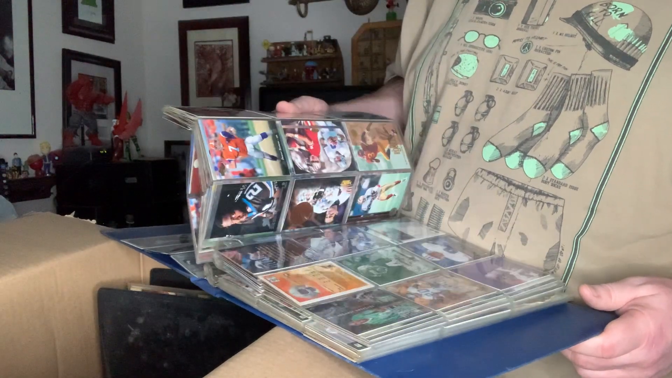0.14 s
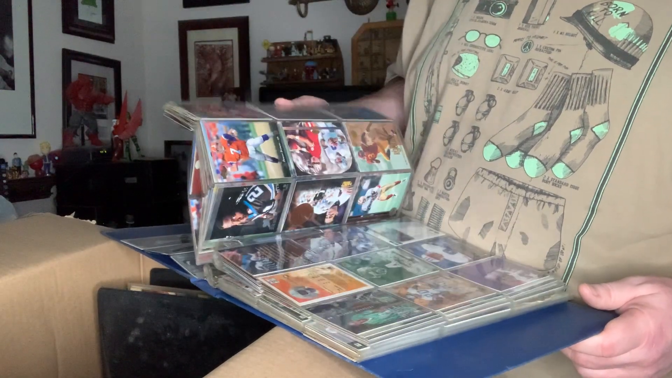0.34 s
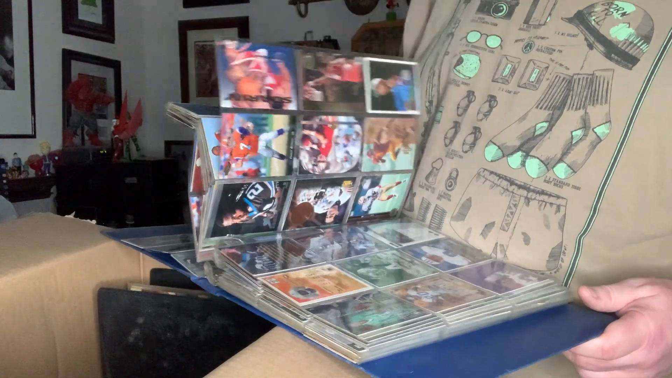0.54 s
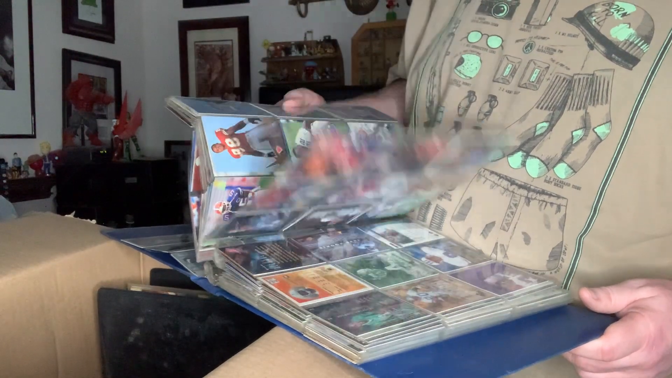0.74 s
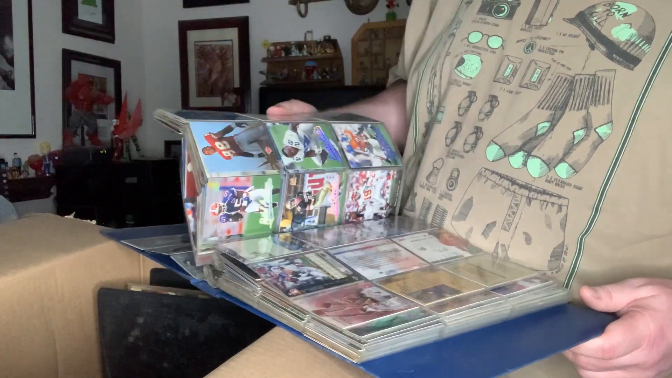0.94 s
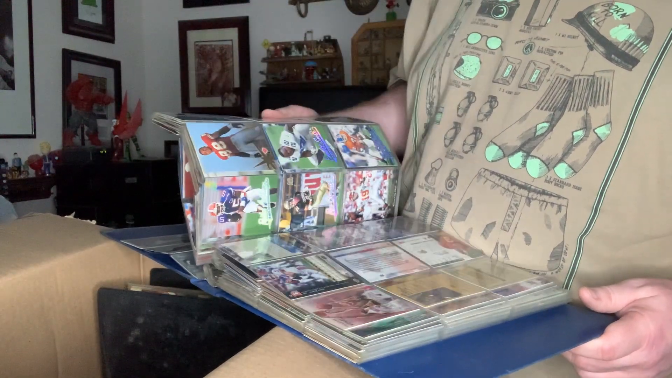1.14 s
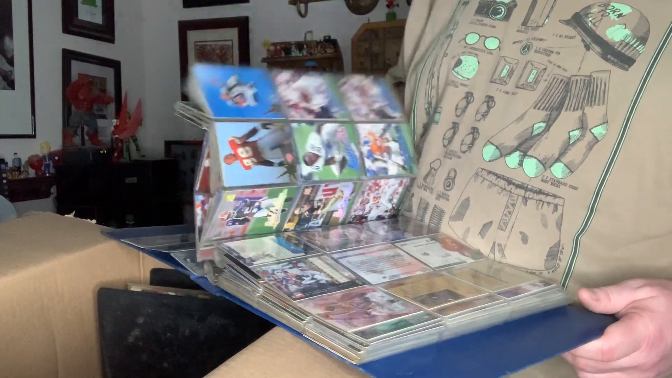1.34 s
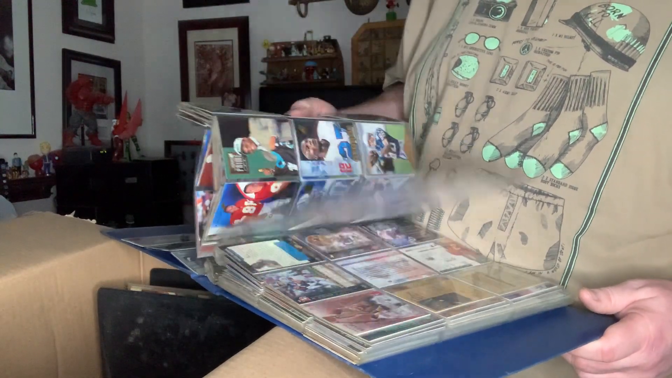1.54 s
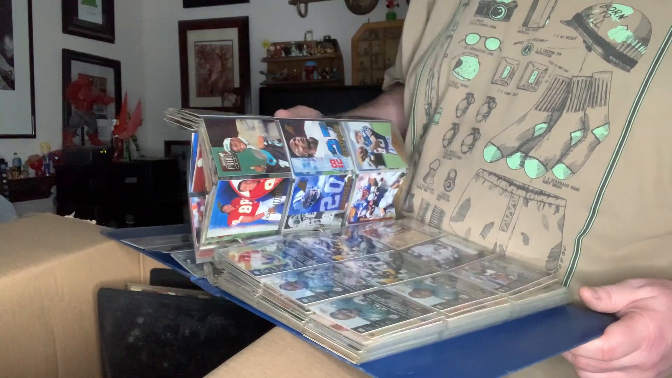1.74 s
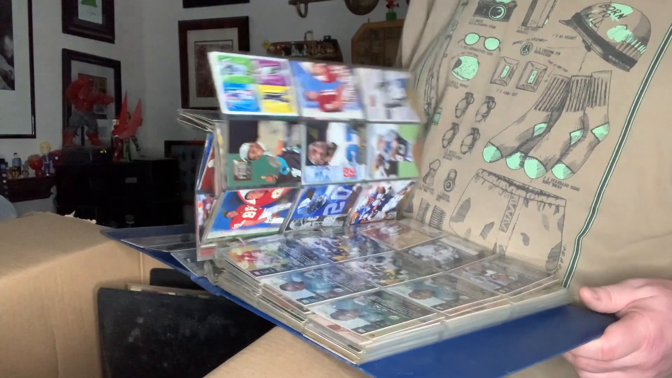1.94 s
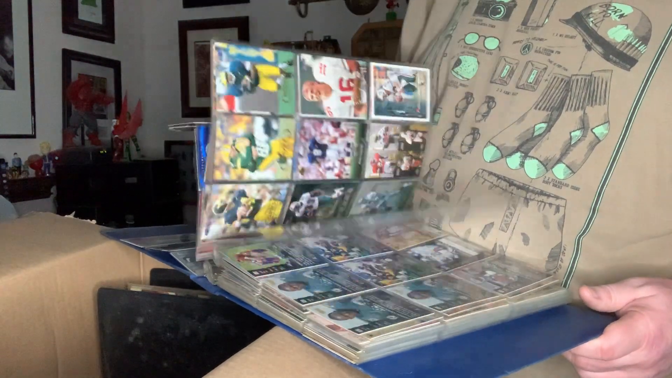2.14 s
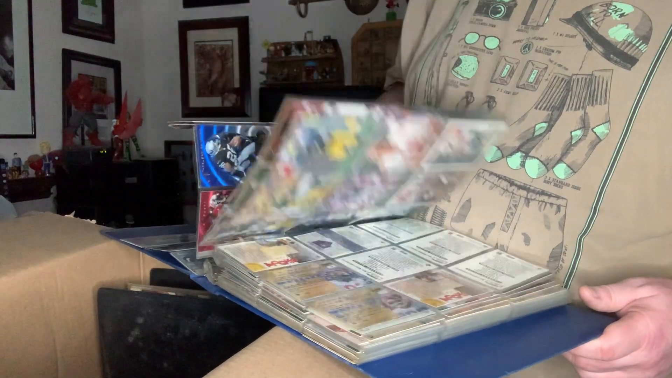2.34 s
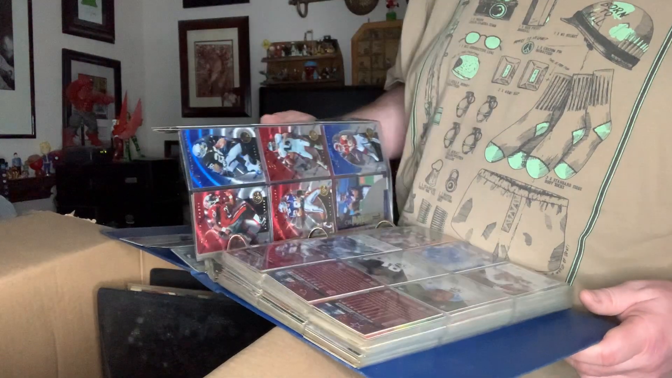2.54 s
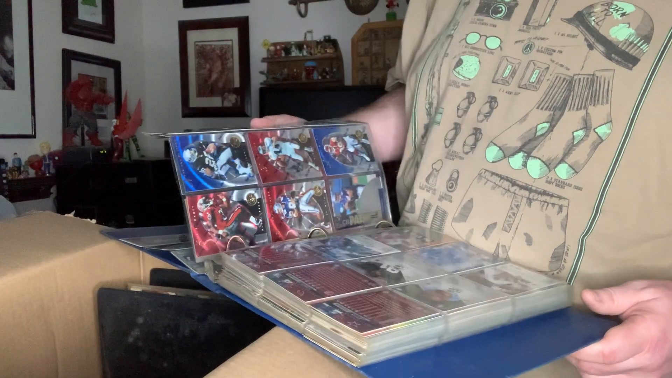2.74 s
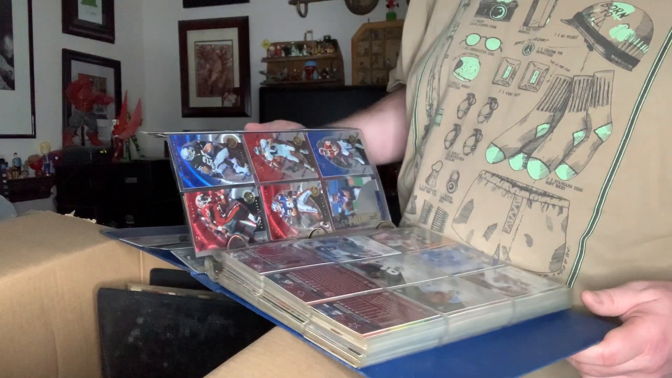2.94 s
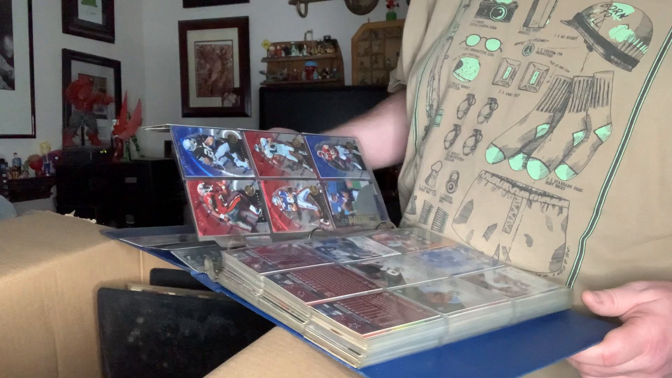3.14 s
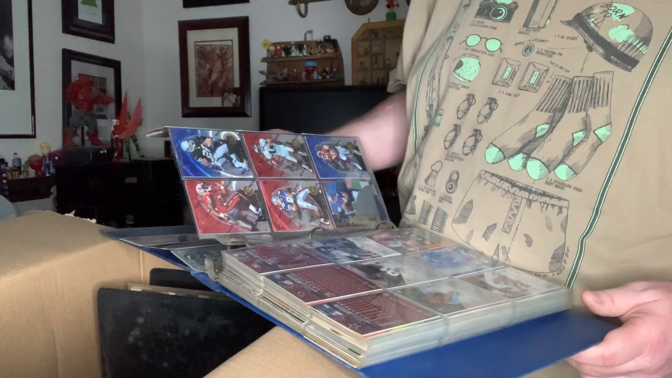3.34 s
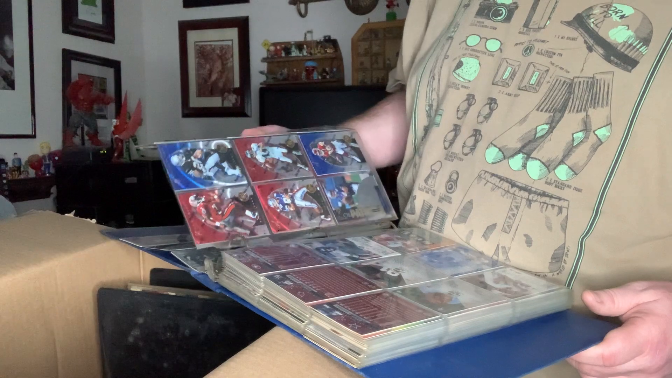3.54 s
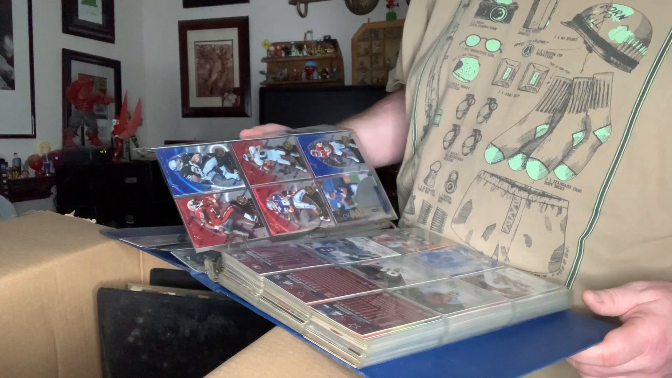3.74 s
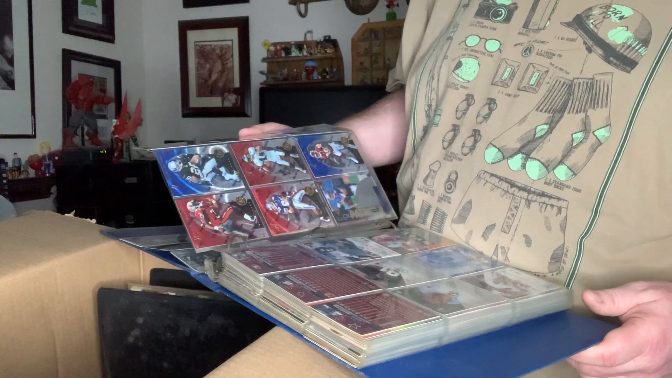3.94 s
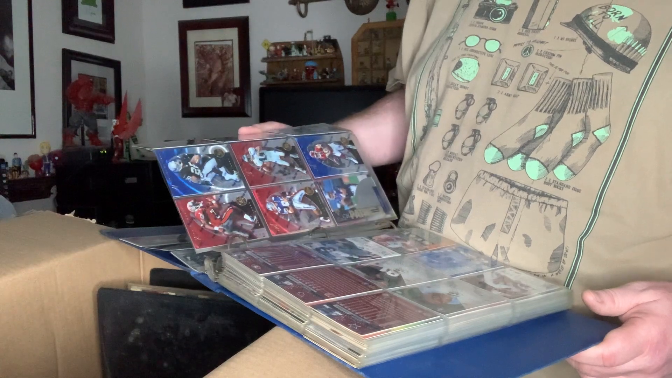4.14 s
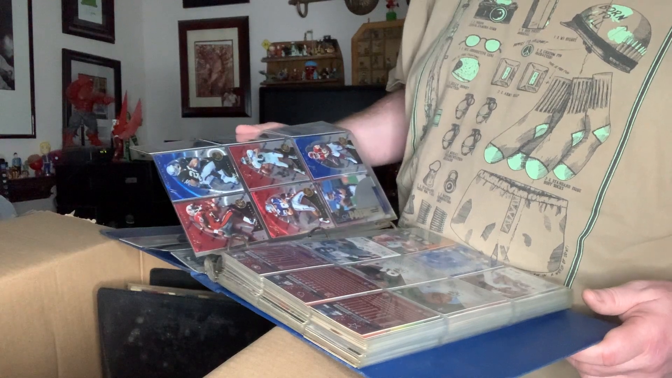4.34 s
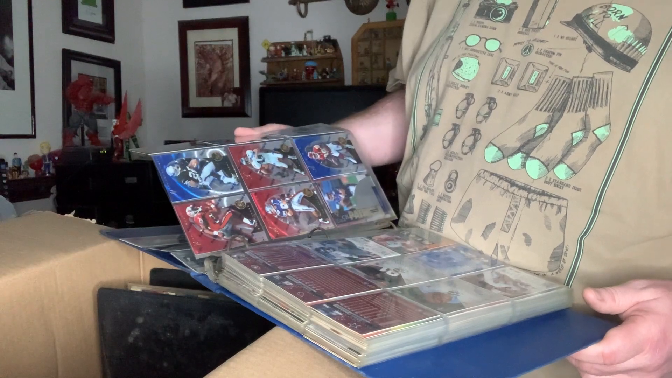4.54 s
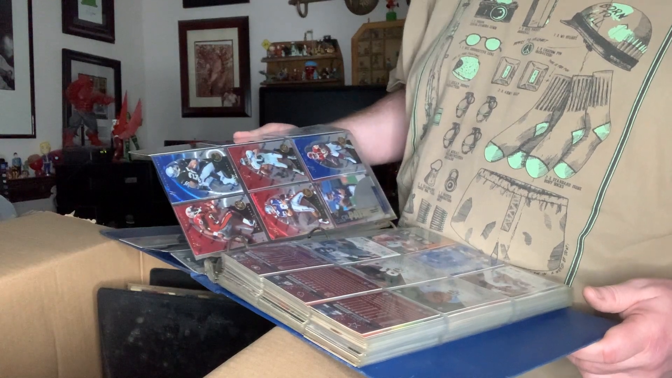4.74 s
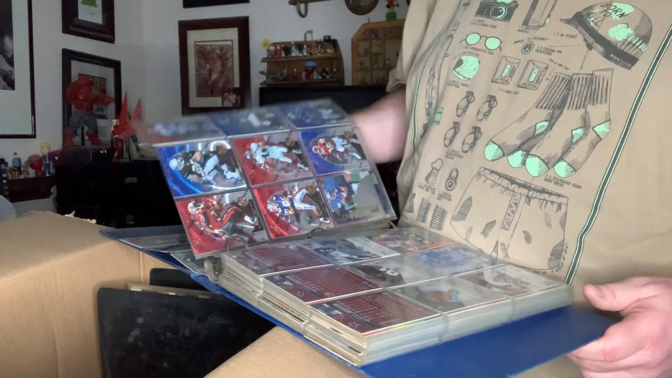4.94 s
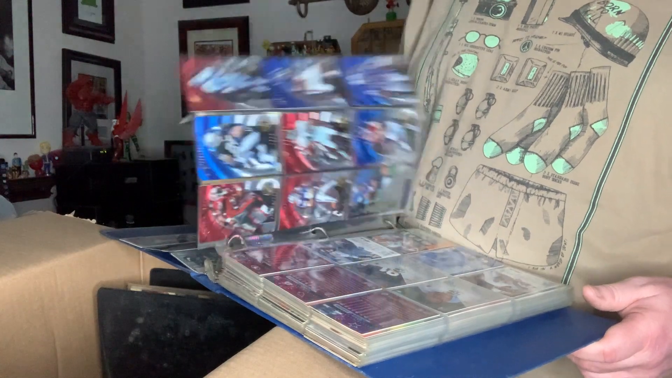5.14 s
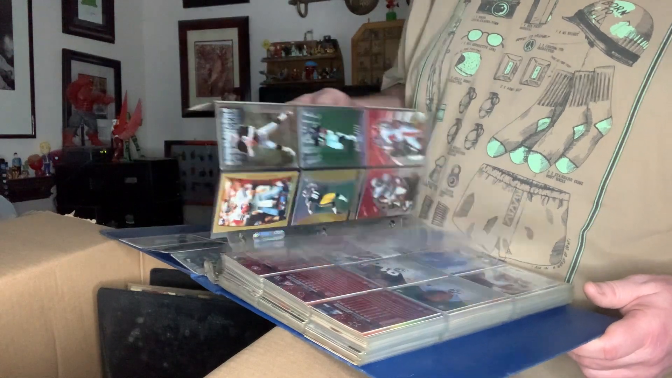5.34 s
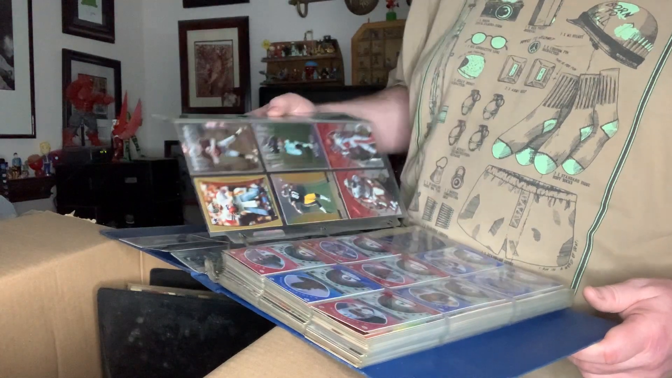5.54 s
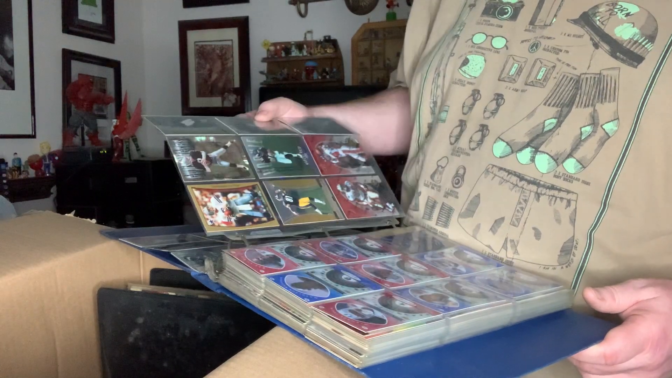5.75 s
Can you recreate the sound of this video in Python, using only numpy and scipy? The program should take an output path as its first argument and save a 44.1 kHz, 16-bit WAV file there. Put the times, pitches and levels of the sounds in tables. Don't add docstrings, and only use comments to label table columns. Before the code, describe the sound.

Crisp, dry handling of plastic card sleeves: a page snaps over at once, lighter flips follow near one, one and a half and two seconds, and a dense flip thumps down at two and a half. Faint rubs and short film squeaks lead into a quiet gap with low house murmur. Near the end pages rustle again and one lands very hard. Close stereo pickup, short soft room tail.

```python
import sys
import numpy as np
from scipy import signal
from scipy.fft import rfft, irfft
from scipy.io import wavfile
from scipy.ndimage import uniform_filter1d

SR = 44100
rng = np.random.default_rng(int(sys.argv[2]) if len(sys.argv) > 2 else 0)


def bounce(signal):
    frames = np.transpose(np.atleast_2d(signal))
    limited = np.clip(frames, -1, 1)
    pcm = np.round(limited * 32767).astype(np.int16)
    wavfile.write(sys.argv[1], SR, pcm)


def elevation(decibels):
    levels = np.asarray(decibels, float)
    return 10 ** (levels / 20)


N = 254898

# t/s, length/s, level/dB, brightness/dB, ring f/Hz
CATCHES = [(0.0, 0.05, -46, -0.5, 1605), (0.076, 0.0071, -45.5, 3, 1683), (0.349, 0.018, -70.5, 3.5, 1810),
           (0.861, .17, -53, -4.5, 849), (1.285, .02, -68, -16, 1459), (1.327, .016, -57, -0.5, 1100),
           (1.468, .012, -60, -5, 1100), (1.49, 0.022, -55, -5.5, 1120), (1.585, 0.079, -47.5, -0.5, 1460),
           (1.655, 0.021, -52, 1.5, 899), (1.851, 0.23, -74, 4.5, 1453), (2.07, 0.0084, -54, -5.5, 1854),
           (2.12, 0.01, -48.5, -1, 1082), (2.183, .055, -52, 2, 1572), (2.27, 0.012, -56, -15.5, 1200),
           (2.329, .1, -51.5, -2, 1109), (2.511, 0.0093, -45, -1.5, 520.6), (2.714, 0.0084, -75, -11, 513),
           (3.071, 0.1, -56, -1.5, 645), (3.38, 0.046, -68.5, 1.5, 2126), (3.42, 0.017, -60.5, 1.5, 1005),
           (3.556, 0.022, -53.5, -0.5, 1167), (4.093, 0.006, -81.5, 6, 1151),
           (4.965, 0.093, -69, -2.5, 1110), (5.068, .03, -60.5, -21, 900), (5.135, .02, -54, -9, 1100),
           (5.195, 0.026, -59, 1, 1272), (5.264, 0.021, -52, -2, 1002), (5.412, 0.004, -49.5, 1.5, 1322),
           (5.47, 0.13, -65, -3.5, 1205)]
# t/s, length/s, release level/dB, brightness/dB, ring f/Hz
BENDS = [(0.45, 0.16, -74.5, 2, 1248), (0.7, 0.087, -67, -13.5, 862), (0.835, 0.024, -59, -3.5, 904.4),
         (1.249, 0.042, -61.5, -7.5, 1500), (1.3, .02, -62, -10, 1100), (1.55, 0.023, -59.5, 0, 1470),
         (2.09, 0.021, -50, -6, 1139), (2.244, 0.011, -51.5, 5, 1244), (2.42, 0.046, -51, -0.5, 1057),
         (2.54, 0.049, -52.5, -4, 1115), (2.86, 0.17, -70.5, -16, 2157), (5.05, 0.12, -58.5, 2, 1095),
         (5.23, 0.025, -61, -7, 958), (5.315, 0.026, -61, 8.5, 1096), (5.35, .012, -56.5, 6, 1300),
         (5.63, 0.062, -59, -15.5, 1229)]
# t/s, length/s, level/dB, hiss re level/dB
RUBS = [(0.015, 0.029, -40.5, -20), (0.449, 0.19, -71, -27), (0.554, 0.12, -67, -23),
        (1.36, 0.089, -64.5, -7), (2.719, 0.1, -78, 2), (2.981, 0.12, -75.5, -6), (3.461, 0.019, -68, 8),
        (3.977, 0.045, -79, -13), (4.209, 0.018, -74, 2.5), (4.728, 0.1, -85.5, 1.5),
        (4.878, 0.14, -76.5, 4)]
# t/s, length/s, level/dB
GUSTS = [(0.054, 0.023, -49), (0.818, 0.078, -65.5), (1.49, 0.043, -63), (1.643, 0.024, -59.5),
         (2.073, 0.082, -63), (2.133, 0.015, -55.5), (2.51, 0.035, -50), (2.644, 0.049, -60),
         (3.082, 0.02, -58.5), (3.432, 0.021, -56.5), (3.529, 0.065, -64), (4.196, 0.024, -65.5),
         (4.649, 0.035, -66), (5.093, 0.054, -57.5), (5.302, .02, -64.5), (5.395, 0.13, -55),
         (5.681, 0.022, -77)]
# t/s, peak level/dB, ring f/Hz, brightness/dB
CRACKS = [(0.0098, -29, 1740, -5.5), (0.0537, -17.5, 1520, 1), (0.0595, -29, 1300, -5.5),
          (0.0778, -29, 1696, 3.5), (0.0805, -33.5, 1503, 1.5), (0.082, -32.5, 1630, 1),
          (0.4507, -59, 1520, -4), (0.6695, -49.5, 863, -9), (0.8638, -29, 750, 5.5),
          (0.8708, -33.5, 700, 0.5), (1.358, -73.5, 1700, 3), (1.381, -41.5, 2140, 0.5),
          (1.407, -43, 1084, 1.5), (1.4624, -36.5, 910, 5.5), (1.588, -37.5, 1320, -8),
          (1.6054, -28.5, 1510, -8), (1.616, -39, 1520, 5), (1.9572, -51, 1600, 0.5),
          (2.0726, -42.5, 594, 0), (2.1263, -35, 1330, 7), (2.1315, -32.5, 1300, -5),
          (2.2288, -28, 980, -0.5), (2.306, -49, 1600, -13.5), (2.3293, -39.5, 980, -11),
          (2.3402, -33.5, 1020, -2.5), (2.4235, -55.5, 1000, -2), (2.4566, -40, 1150, -8.5),
          (2.463, -40.5, 1562, 8), (2.5065, -31.5, 563, -3.5), (2.51, -37, 1198, 4), (2.5134, -31, 546, 9),
          (2.522, -53.5, 1006, 6.5), (2.5584, -30.5, 1573, -4), (3.074, -37.5, 601, 3.5),
          (3.5723, -46, 1097, -11), (5.0334, -50.5, 975, 9.5), (5.147, -52, 1300, -8.5),
          (5.1967, -38.5, 1090, 4.5), (5.2098, -49.5, 1200, 5), (5.279, -42, 1500, 7),
          (5.3718, -39, 1270, 1), (5.375, -24.5, 1420, 1), (5.4096, -9.5, 1230, -9.5)]
# t/s, peak level/dB, ring f/Hz, brightness/dB
POPS = [(0.0658, -26.5, 1670, -21), (0.84, -73, 1100, -31), (0.842, -60, 970, 1), (0.8541, -39, 695, -6),
        (0.967, -41.5, 1110, -14), (1.6, -55, 1920, -10), (1.515, -42, 1270, -3), (1.5655, -50, 1100, -13),
        (1.6402, -33, 1400, -8.5), (2.1112, -39, 1053, -5), (2.1975, -40, 1575, -11.5),
        (2.38, -51.5, 1370, -9), (2.4905, -36, 935, -15), (2.4982, -33.5, 1200, -16),
        (2.5962, -32, 850, -21.5), (2.6063, -37, 1040, -18), (2.617, -34.5, 1030, -12.5),
        (3.118, -42.5, 640, -2), (3.196, -48.5, 900, -16), (3.5554, -53, 1050, -6), (3.619, -48, 1103, 1.5),
        (4.969, -62, 709, 4), (4.9835, -74, 1060, 0), (5.0683, -61.5, 1030, 15), (5.116, -50, 950, -4),
        (5.2375, -50.5, 1100, 1), (5.2535, -55.5, 1800, 5), (5.2686, -39, 950, -12),
        (5.6714, -59, 694, 1.5), (5.694, -47.5, 1110, -19)]
# t/s, peak level/dB, ring f/Hz, brightness/dB
KNOCKS = [
    (1.0284, -49.5, 1116, -25.5),
    (2.1434, -39, 632, -6),
    (2.397, -42.5, 1500, -7.5),
    (2.577, -35.5, 624, -12.5),
    (3.4234, -39, 1106, -1.5),
    (5.3451, -36, 1020, -2.5),
    (5.382, -27, 1265, -8),
]
# t/s, peak level/dB of the tick
TICKS = [(0.3529, -46.5), (0.7074, -58.5), (0.887, -38), (1.269, -57), (1.33, -38), (1.3382, -33.5),
         (1.4299, -53), (1.541, -37.5), (1.8602, -47), (2.145, -35), (2.1826, -41), (2.7222, -44),
         (3.218, -54.5), (3.32, -67.5), (4.094, -54), (4.2027, -53.5), (4.227, -64.5), (4.885, -53),
         (5.0184, -48), (5.192, -29), (5.331, -48.5), (5.358, -52)]
# t/s, peak level/dB, centre f/Hz, width f/Hz,
# burst/ms
FLECKS = [(.005, -34.5, 1700, 500, 1.3), (0.0534, -19, 4130, 1607, .35), (.0538, -32.5, 13630, 2500, .3),
          (.0658, -34.5, 1516, 700, 0.54), (.0818, -43.5, 13500, 2500, .5), (.4507, -51, 2260, 2000, 0.37),
          (1.2462, -54.5, 1895, 1600, .5), (1.268, -56.5, 13380, 4000, .4), (1.268, -52.5, 1820, 700, 0.49),
          (1.2915, -58, 1870, 800, 1.5), (1.315, -57, 1130, 500, 1.1), (1.3335, -52, 1036, 900, 0.85),
          (1.381, -44.5, 3030, 2500, 0.28), (1.407, -47.5, 2340, 2000, .25),
          (1.4345, -59, 12500, 4500, 0.33), (1.4625, -40.5, 13000, 4000, .3),
          (1.4632, -43, 3420, 900, 0.37), (2.1265, -38.5, 4100, 700, 1), (2.1455, -50, 5500, 4000, 0.34),
          (2.2305, -39, 4100, 900, 1.3), (2.2585, -42, 4400, 800, 2), (2.269, -46, 4430, 800, 1.4),
          (2.329, -43.5, 1300, 900, 0.32), (2.4635, -45, 8300, 700, .6), (2.5135, -28, 4824, 1200, 0.55),
          (2.514, -34, 8390, 900, 0.46), (5.192, -40.5, 13340, 2500, .4),
          (5.2795, -49.5, 12460, 4000, 0.66), (5.287, -58, 4214, 500, 2.1), (5.375, -38.5, 13000, 3000, .5),
          (5.375, -38.5, 6510, 500, 0.56), (5.39, -43, 1124, 400, 1.1), (5.4073, -37, 1500, 700, 0.83),
          (5.4095, -29.5, 3070, 900, .4), (5.4095, -24.5, 8300, 600, .5), (5.4093, -36, 13970, 2500, 0.33),
          (5.416, -36, 2103, 600, 1),
          (.8587, -48, 12500, 5000, .3), (.8638, -29, 13000, 3980, 0.36), (.8708, -32, 1520, 1199, 0.48),
          (1.5148, -42, 1240, 600, .7), (1.5415, -47, 3500, 2500, 0.26), (2.1118, -42, 1060, 600, .6),
          (2.4628, -34, 4150, 3500, 0.35), (2.6068, -35, 1100, 900, 0.41), (3.399, -50, 2210, 301, 4.2),
          (3.555, -56, 12500, 5000, .3), (4.886, -59.5, 5800, 1500, 2.3), (.0545, -30.5, 1600, 592.6, 0.53),
          (.021, -37, 4470, 900, 3.2), (5.282, -41, 1194, 897, 3)]
# t/s, peak level/dB, start f/Hz, end f/Hz, length/ms
SLAPS = [(0.0548, -39.5, 944, 304, 11), (0.058, -40, 330, 228.2, 22), (0.076, -45, 90, 65.6, 56),
         (1.642, -48.5, 111, 60.05, 27), (2.138, -52, 87, 66, 82), (2.5218, -26, 352.3, 170, 8),
         (2.5205, -32.5, 634.5, 417, 4.6), (2.573, -45.5, 85.5, 55, 73), (3.074, -43, 714, 479, 17),
         (3.422, -54, 607, 208, 18), (5.4088, -20.5, 840, 208, 5.9), (5.447, -42.5, 98, 63.1, 54)]
# t/s, peak level/dB, three mode f/Hz
TAPS = [(0.0505, -45, 1670, 4050, 1310), (0.3475, -61.5, 1780, 1300, 3670),
        (1.856, -53.5, 1454, 1995, 3280), (2.124, -44, 1244, 4220, 1570), (3.0735, -43.5, 564, 660, 1100),
        (3.4159, -44.5, 713, 1080, 505), (3.555, -49.5, 1233, 1527, 3430), (4.092, -55, 1150, 2215, 1960),
        (4.2, -62, 1170, 2030, 3360), (4.227, -67, 2020, 2350, 1050), (5.032, -59.5, 2200, 987, 4800),
        (5.3775, -32, 1220, 2120, 1600), (5.4084, -39, 1110, 530, 2040)]
# t/s, length/s, level/dB
SQUEAKS = [
    (0.9, 0.088, -57.5),
    (1.6, 0.021, -57.5),
    (3.39, 0.0173, -56),
    (3.43, 0.052, -57),
    (3.493, 0.014, -52),
    (3.52, 0.03, -67.5),
    (3.565, 0.034, -67),
]
# f/Hz, width f/Hz, level/dB
FILM = [(2144, 260, 4), (2620, 160, -2), (3020, 80, -3)]
# t/s, length/s, level/dB
GLIDES = [(0.02, .028, -58.5), (1.282, 0.019, -78), (1.325, .025, -65), (1.587, .05, -54),
          (1.64, 0.024, -61.5), (2.116, .025, -60), (2.186, .085, -58.5), (2.422, .05, -66.5),
          (3.072, 0.034, -71), (3.386, .08, -72), (5.258, .02, -68.5), (5.409, 0.024, -69)]
# f/Hz, level/dB per Hz
SUM_LOW = [(21, -48), (35, -5), (69, -5.5), (133, -0.5), (316, -2), (405, -4.5), (837, -2.5), (1290, -2.5),
           (2180, -9), (2330, -14), (3000, -16), (4300, -18.5), (5400, -18), (7220, -19.5), (7900, -13.5),
           (10300, -45.5), (17400, -120)]
SUM_HIGH = [(4740, -30.5), (8050, 6.5), (8400, 2), (9000, -1), (9800, -14), (10600, -22), (11200, -11.5),
            (13000, -9.5), (13800, -5.5), (15300, -19), (16300, -39)]
# f/Hz, level/dB
DIFFERENCE = [(60, -9), (250, -8), (600, -7), (1200, -14), (2400, -4), (5000, 1), (6200, -7), (7200, 3),
              (8100, -3), (9300, 2), (10500, 20), (11500, 5), (13000, -14), (15400, 9)]
# f/Hz, left minus right level/dB
LEAN = [(60, -3.0), (110, -4.0), (200, -5.0), (380, -5.5), (700, -3.0), (1290, 0.5), (2380, 0.5),
        (4400, 0.0), (8120, -3.5), (15000, 0.0)]
# f/Hz, level/dB per Hz
HUSH = [(18, -40.5), (30, -12.5), (101, -11), (158, -6.5), (357, -11), (397, -22), (606, -16.5), (673, -21),
        (831, -21), (2150, -31), (8450, -38), (10400, -43.5), (13200, -39.5), (16300, -55.5)]
# f/Hz, likeness
HUSH_LIKE = [(60, 0.4), (130, -0.9), (290, 0.2), (640, -0.049), (1410, -0.74), (3100, -0.5), (6820, 0.67),
             (15000, 0.5)]

CROSS_HZ, NOTCH_HZ = 8000, 10600
STEP_S = .001
CATCH_ATTACK_S, ATTACK_S, AIR_ATTACK_S = .009, 0.018, 0.024
SAG_DB_S, RELEASE_DB_S = (55, 90, 106, 30), (310, 230, 234, 156)
RUB_SAG_DB_S = 27.5


def rustle():
    crinkle_db, scrape_db, hiss_db, boom_db, ring_hz = movements()
    hz = np.fft.rfftfreq(2 ** 18, 1 / SR)
    sheet, contact = patches(elevation(walk(60) + 2.0 * walk(250)), ring_hz)
    colour = ports_gain(hz)
    crinkle = shaped(sheet, colour * band(hz, 430, 2300))
    scrape_peak = elevation(2.3 * np.exp(-((hz - 4500) / 600) ** 2))
    scrape = shaped(sheet, colour * scrape_peak * band(hz, 2500, 6800) * (hz < CROSS_HZ))
    hiss = shaped(contact, colour * (hz >= CROSS_HZ) * elevation(1.0 * (hz > NOTCH_HZ)))
    boom = shaped(rng.standard_normal((2, N)), colour * band(hz, 38, 160))
    flap = elevation((crinkle_db + boom_db) / 2 - 4.5) * shaped(sheet, colour * band(hz, 89, 270))
    hiss = elevation(hiss_db + 2.6 * walk(61)) * hiss
    return elevation(crinkle_db) * crinkle + elevation(scrape_db) * scrape + hiss + flap + elevation(boom_db) * boom


def patches(slip, ring_hz):
    out = np.zeros((2, N))
    shared = slip * (rng.standard_normal((2, N)) + 2.8 * grains(800, 3.3))
    apart = np.array([[1], [-1]])
    for hz in 180 * 2 ** np.arange(0, 5.5, .25):
        own = rng.standard_normal(N) + 1.9 * grains(hz / 6, 7.4)
        octaves = np.log2(hz / ring_hz)
        near_db = 4.4 * np.exp(-(octaves / 0.27) ** 2) + 0.83 * np.exp(-((octaves - .6) / 0.064) ** 2)
        flicker_db = 4.2 * walk(45)
        b, a = signal.iirpeak(hz, 9.0, SR)
        ringing = signal.lfilter(b, a, shared + 0.37 * apart * slip * own)
        out += elevation(near_db + flicker_db) * ringing / np.sqrt(hz)
    contact = np.sqrt(slip) * (rng.standard_normal((2, N)) + 1.2 * grains(580, 4.0))
    return out, contact


def movements():
    still_db = np.array([-100, -91, -100, -70.5])
    power = elevation(2 * still_db)[:, None] * np.ones(int(N / SR / STEP_S) + 2)
    ring = 520 * power[0]
    for rows, swell_db, attack_s in ((CATCHES, 0, CATCH_ATTACK_S), (BENDS, 12, ATTACK_S)):
        for s, length, db, bright_db, hz in rows:
            hiss_db = db + 0.95 * bright_db - 2 - 0.029 * (db + 51)
            levels = db, db + bright_db, hiss_db
            each = [stroke(s, length, d, attack_s, -sag, release, swell_db)
                    for d, sag, release in zip(levels, SAG_DB_S, RELEASE_DB_S)]
            power[:3] += each
            ring = ring + hz * each[0]
    ring = ring / power[0]
    for s, length, db, hiss_db in RUBS:
        levels = db - 14, db, db + hiss_db
        power[:3] += [stroke(s, length, d, ATTACK_S, -RUB_SAG_DB_S, release)
                      for d, release in zip(levels, RELEASE_DB_S)]
    for s, length, db in GUSTS:
        power[3] += stroke(s, length, db, AIR_ATTACK_S, -SAG_DB_S[3], RELEASE_DB_S[3])
    return [per_sample(curve) for curve in (*(10 * np.log10(power)), ring)]


def stroke(s, length, db, attack_s, slope_db_s, release_db_s, swell_db=0):
    u = np.arange(int(N / SR / STEP_S) + 2) * STEP_S - s
    if swell_db:
        slope_db_s = swell_db / length
    attack_db = 30 * np.minimum(u, 0) / attack_s
    slide_db = slope_db_s * np.clip(u, 0, length) - swell_db
    release_db = -release_db_s * np.maximum(u - length, 0)
    return elevation(2 * (db + attack_db + slide_db + release_db))


def snaps(size=2048):
    out = np.zeros(N + size)
    hz, t = np.fft.rfftfreq(size, 1 / SR), np.arange(size) / SR
    colour = uniform_filter1d(ports_gain(hz), size=14)
    edge = causal(colour * band(hz, 3300, 7600)) * causal(0.54 + 1 / (1 + ((hz - 4200) / 800) ** 2))
    tick = causal(colour * band(hz, 8000, 16000)) * elevation(-5 * (hz > NOTCH_HZ))
    for s, db, ring_hz, edge_db, tick_db, ms in creases():
        u = t * 1000 / (1.6 * max(ms, .1))
        burst = rfft(rng.standard_normal(size) * u * np.exp(-u))
        burst = burst / uniform_filter1d(np.abs(burst), size=30) ** 0.93
        first, second = (1 / np.sqrt(1 + ((hz - k * ring_hz) * ms / 55) ** 2) for k in (1, 1.75))
        ring = (.05 + first + .5 * second) * band(hz, 400, 2400) * elevation(-8.5 * (hz > 2250))
        parts = irfft(burst * np.array([causal(ring), edge, tick]))
        gains = elevation(db - 1.0 + np.array([0, edge_db, tick_db])) / np.abs(parts).max(axis=1)
        click = gains @ parts
        start = int(s * SR) - np.abs(click).argmax()
        out[start:start + size] += click
    return out[:N]


def creases():
    rows = []
    for table, treble_db, ms in ((CRACKS, 1, .21), (POPS, 2.5, .55), (KNOCKS, 2.5, 0.88)):
        rows += [(s, db, hz, bright, bright + treble_db, ms) for s, db, hz, bright in table]
    body_db, edge_db = -27, -7
    return rows + [(s, db + body_db, 1300, edge_db - body_db, -body_db, .16) for s, db in TICKS]


def flecks(size=1024):
    out, t, hz = np.zeros(N + size), np.arange(size) / SR, np.fft.rfftfreq(size, 1 / SR)
    for s, db, centre_hz, width_hz, ms in FLECKS:
        u = t * 1000 / max(ms, .1)
        burst = rng.standard_normal(size) * u * np.exp(-u)
        mode = causal(1 / (1 + (2 * (hz - centre_hz) / width_hz) ** 4))
        fleck = irfft(rfft(burst) * mode)
        start = max(int(s * SR) - np.abs(fleck).argmax(), 0)
        out[start:start + size] += elevation(db) * fleck / np.abs(fleck).max()
    return out[:N]


def slaps():
    out, t = np.zeros(N), np.arange(N) / SR
    for s, db, start_hz, end_hz, ms in SLAPS:
        u = np.clip((t - s) * 1000 / ms, 0, 1)
        hz = start_hz * (end_hz / start_hz) ** u
        phase = 2 * np.pi * np.cumsum(hz * (u > 0)) / SR
        out += elevation(db) * np.sin(np.pi * u ** 0.88) * np.sin(phase)
    return out


def taps(size=4096):
    out, t = np.zeros(N + size), np.arange(size) / SR
    modes_db, t60_s, push_ms = (4, -9.5, -5.5), (0.053, .05, 0.053), 4
    for s, db, *modes_hz in TAPS:
        push = np.abs(rng.standard_normal(size)) * np.exp(-t * 1000 / push_ms)
        onset = np.convolve(push[:400], np.ones(size))[:size]
        ring = sum(elevation(d - 60 * t / t60) * np.sin(2 * np.pi * hz * t) * onset
                   for hz, d, t60 in zip(modes_hz, modes_db, t60_s))
        start = int(s * SR)
        out[start:start + size] += elevation(db) * ring / np.abs(ring).max()
    return out[:N]


def squeaks():
    power = sum(stroke(s, length, db, CATCH_ATTACK_S, -RUB_SAG_DB_S, 609) for s, length, db in SQUEAKS)
    slip = rng.standard_normal((2, N)) + 4.0 * grains(1000, 2.1)
    film = np.zeros((2, N))
    for hz, width_hz, db in FILM:
        b, a = signal.iirpeak(hz, hz / width_hz, SR)
        film += elevation(db - 2 * walk(60)) * signal.lfilter(b, a, slip)
    return per_sample(np.sqrt(power)) * film / np.sqrt(np.mean(film ** 2))


def glides():
    power = sum(stroke(s, length, db, CATCH_ATTACK_S, -RUB_SAG_DB_S, RELEASE_DB_S[2])
                for s, length, db in GLIDES)
    hz = np.fft.rfftfreq(2 ** 18, 1 / SR)
    slip = rng.standard_normal((2, N)) + 1.5 * grains(800, 3.5)
    hiss = shaped(slip, ports_gain(hz) * (hz > NOTCH_HZ))
    return per_sample(np.sqrt(power)) * elevation(3.6 * walk(90)) * hiss


def near_echo(x, size=1024, share=.2, decay_ms=3):
    echo = rng.standard_normal(size) * np.exp(-np.arange(size) / SR * 1000 / decay_ms)
    echo = echo / np.sqrt(np.sum(echo ** 2))
    return np.sqrt(1 - share) * x + np.sqrt(share) * np.convolve(x, echo)[:N]


def room(x, t60_s=0.3, treble_hz=6060, treble_db=-6):
    t = np.arange(int(.5 * SR)) / SR
    tail = rng.standard_normal(len(t)) * elevation(-60 * t / t60_s) * (1 - np.exp(-t / 0.00073))
    dull = signal.sosfilt(signal.butter(2, treble_hz, fs=SR, output="sos"), tail)
    tail = dull + elevation(treble_db) * (tail - dull)
    return signal.fftconvolve(x, tail / np.sqrt(np.sum(tail ** 2)))[:N]


def hush(level_db=-76.5):
    hz = np.fft.rfftfreq(N, 1 / SR)
    like = np.clip(spectrum_db(HUSH_LIKE, hz), -.9, .9)
    noise = elevation(1.2 * walk(5.4)) * rng.standard_normal((2, N))
    mid, side = rfft(noise) * elevation(spectrum_db(HUSH, hz))
    mid, side = irfft(mid * np.sqrt(1 + like), N), irfft(side * np.sqrt(1 - like), N)
    return elevation(level_db) * np.array([mid + side, mid - side]) / np.sqrt(np.mean(mid ** 2))


def grains(density, spread_db):
    chance, size = rng.random((2, N))
    size_db = -spread_db * np.log(np.abs(2 * size - 1) + .06)
    return (chance < density / SR) * np.sign(size - .5) * elevation(size_db)


def walk(rate):
    k = int(SR / rate)
    held = np.repeat(rng.standard_normal(N // k + 1), k)
    return 1.2 * uniform_filter1d(held, k)[:N]


def per_sample(curve):
    return np.interp(np.arange(N) / SR / STEP_S, np.arange(len(curve)), curve)


def spectrum_db(table, hz):
    f, v = np.transpose(table)
    return np.interp(np.log(hz + 1), np.log(f + 1), v)


def ports_gain(hz):
    return elevation(np.where(hz < CROSS_HZ, spectrum_db(SUM_LOW, hz), spectrum_db(SUM_HIGH, hz)))


def band(hz, lo_hz, hi_hz):
    return 1 / np.sqrt((1 + (lo_hz / (hz + 1)) ** 8) * (1 + (hz / hi_hz) ** 8))


def shaped(x, gain):
    size = 2 * (len(gain) - 1)
    y = irfft(rfft(x, size) * gain, size)[..., :N]
    return y / np.sqrt(np.mean(y ** 2))


def causal(gain):
    c = irfft(np.log(gain + 1e-6), axis=-1)
    half = c.shape[-1] // 2
    fold = np.r_[1, 2 * np.ones(half - 1), 1, np.zeros(half - 1)]
    return np.exp(rfft(c * fold, axis=-1))


def scene():
    room_db, diffuse_share = -13, 0.35
    hits = snaps() + slaps() + taps()
    wet, wet_again = elevation(room_db) * room(hits), elevation(room_db) * room(hits)
    hits = hits + flecks()
    sheet, sheet_again = rustle() + squeaks() + glides()
    hz = np.fft.rfftfreq(N, 1 / SR)
    ratio = elevation(spectrum_db(DIFFERENCE, hz))
    lean = np.tanh(spectrum_db(LEAN, hz) * np.log(10) / 20)
    in_phase = np.clip(lean * (1 + ratio ** 2) / (1.6 * ratio), -1, 1)
    turn = in_phase + 1j * np.sqrt(1 - in_phase ** 2)
    alike = np.sqrt(1 - diffuse_share) * (sheet + wet)
    diffuse = np.sqrt(diffuse_share) * (sheet_again + wet_again)
    difference = near_echo(hits) + alike + diffuse
    mid, side = sheet + hits + wet, irfft(ratio * turn * rfft(difference), N)
    return np.array([mid + side, mid - side]) + hush()


def low_pass(x):
    return signal.sosfilt(signal.butter(12, 16490, fs=SR, output="sos"), x)


def record(dry):
    return low_pass(dry)


dry = scene()
out = record(dry)
bounce(out)
```